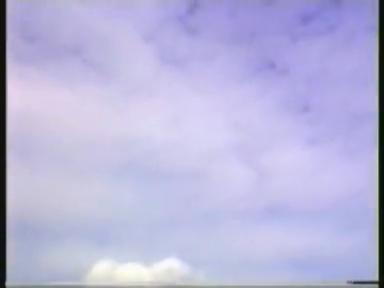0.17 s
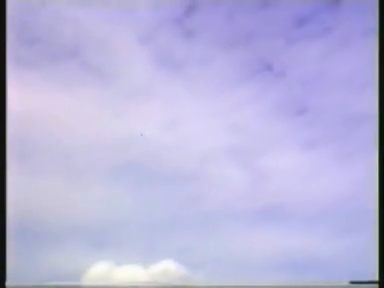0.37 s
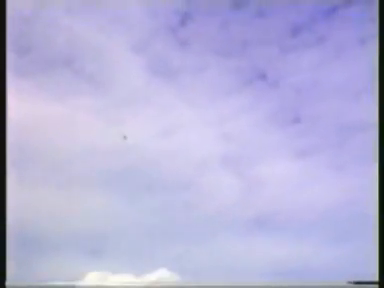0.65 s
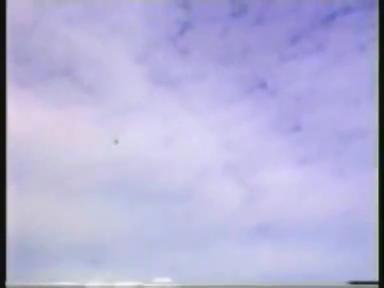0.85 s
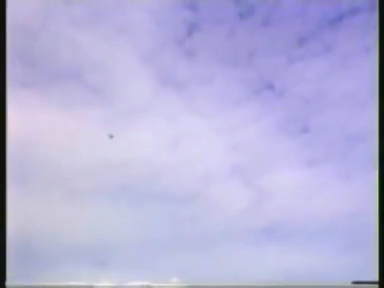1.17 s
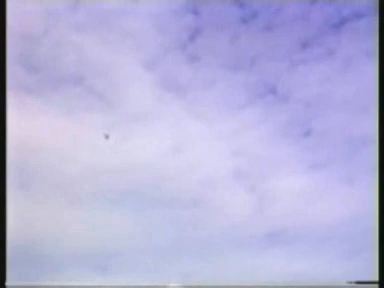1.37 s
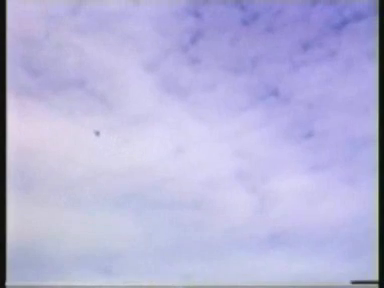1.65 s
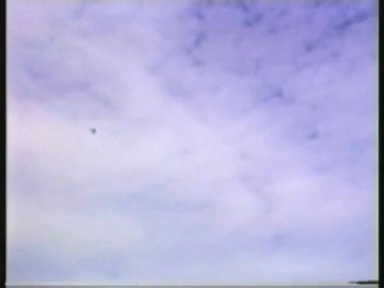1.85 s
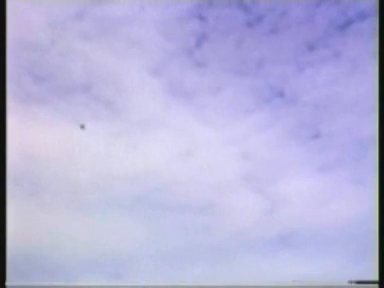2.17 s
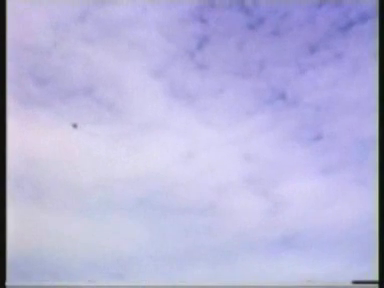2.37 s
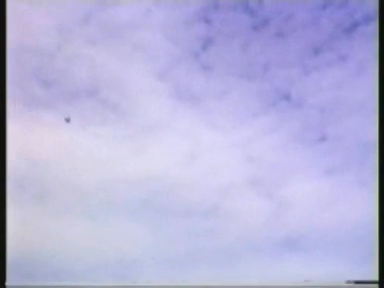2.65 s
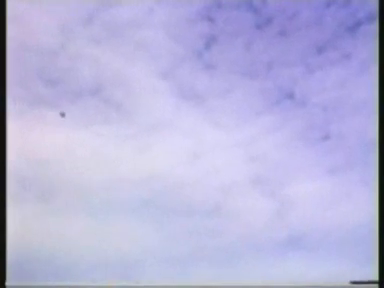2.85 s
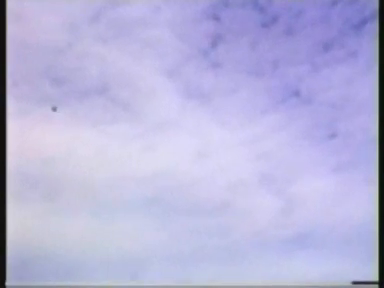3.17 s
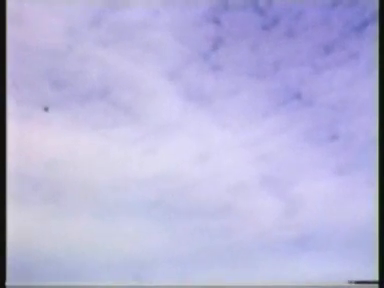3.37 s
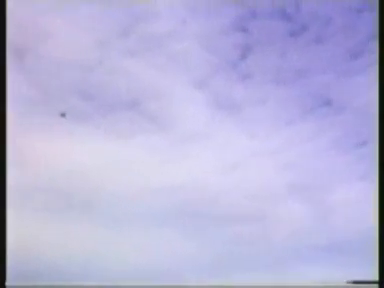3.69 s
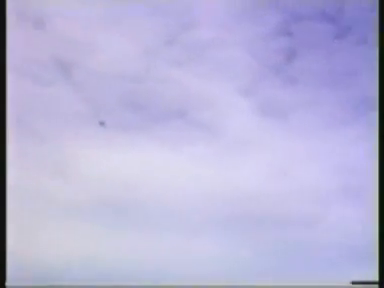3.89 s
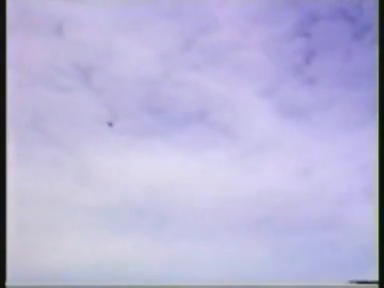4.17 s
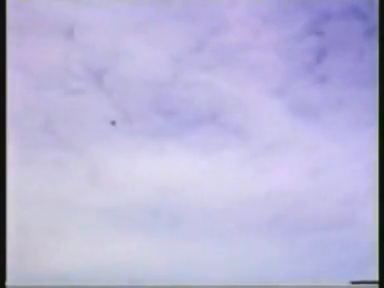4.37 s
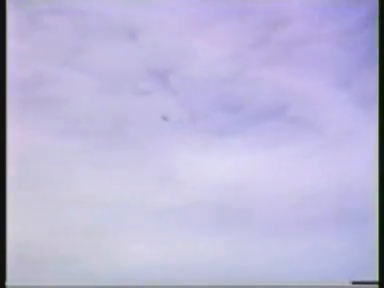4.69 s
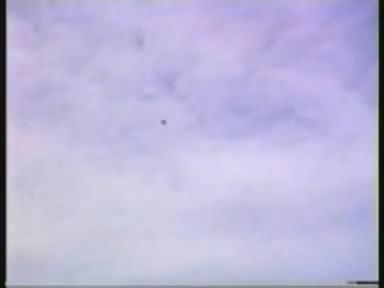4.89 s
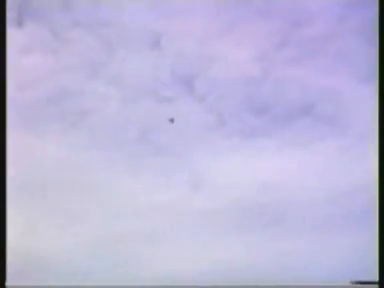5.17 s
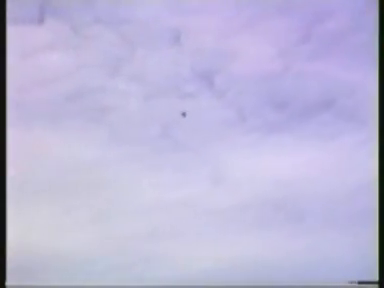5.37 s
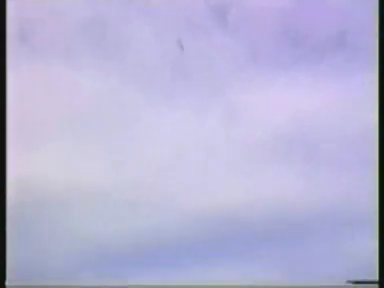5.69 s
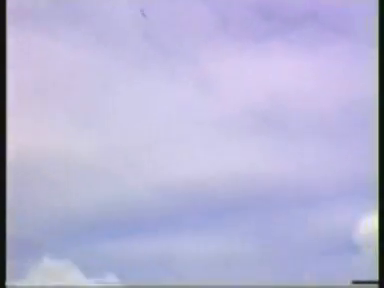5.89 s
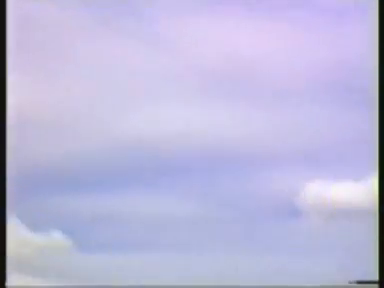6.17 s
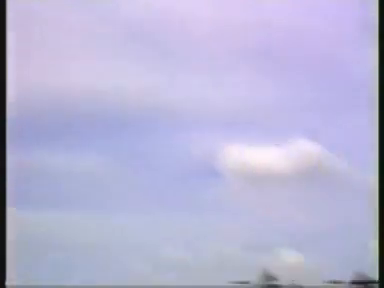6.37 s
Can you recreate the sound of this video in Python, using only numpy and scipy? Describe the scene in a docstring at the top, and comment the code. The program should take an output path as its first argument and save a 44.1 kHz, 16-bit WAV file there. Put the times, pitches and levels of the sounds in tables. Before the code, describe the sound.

A jet aircraft roars far overhead, its rumble swelling and fading with brief bursts of tearing crackle.

```python
"""A jet fighter roars far overhead as it climbs and turns, heard at head height on an open field.
On the way down, the sound waves of its exhaust steepen into small shocks; the strongest are heard as snaps.
Churning air makes the low, middle and high parts of the roar swell and fade over a deep rumble.
The ground reflects a second copy, which lags more as the jet climbs. The microphone circuit hisses softly."""
import sys
import numpy as np
from scipy import signal
from scipy.fft import rfft, irfft
from scipy.io import wavfile
from scipy.ndimage import uniform_filter1d

SR = 44100
rng = np.random.default_rng(int(sys.argv[2]) if len(sys.argv) > 2 else 0)


def unload_wav(signal):
    """Save mono or channel-first audio to the path in sys.argv[1] as 16-bit WAV at rate SR, clipped to [-1, 1]."""
    wavfile.write(
        sys.argv[1],
        SR,
        np.round(np.clip(np.atleast_2d(signal).T, -1, 1) * 32767).astype(np.int16),
    )


N = 288237

# Tone colours, from low to high pitch: f/Hz, relative level/dB
EXHAUST_TONE = [(60, -31.5), (150, -9), (300, 2), (700, -5.5), (1500, -13.5), (3000, -31)]  # near the nozzle
ROAR_TONE = [(60, -56.5), (110, -12.5), (150, -5), (200, -3), (260, -1.5), (500, -1), (900, -7),
             (1300, -14.5), (2000, -25.5), (2700, -38), (3150, -58.5), (3600, -45.5), (4500, -47),
             (7000, -61.5)]  # after the air and the microphone
SCATTER_TONE = [(10, 10), (150, 8), (230, -6), (1200, -6), (2500, -5), (4000, -2), (SR / 2, -2)]  # sound that takes detours, which smear its shocks
SNAP_TONE = [(500, -9), (1000, -1.5), (2000, -12), (2700, -11.5), (3150, -26.5), (3600, -25), (4500, -24),
             (7000, -40)]
RUMBLE_TONE = [(15, -15), (30, -21), (45, -15.5), (70, -6), (95, -2), (125, -5), (170, -32)]
HISS_TONE = [(1500, -6), (2800, 1), (3150, -2.5), (3600, -2.5), (5000, -4.5), (7200, -3.5)]

# Swells that the churning air lets through: t/s, level/dB
BASS_SWELL = [(-0.0, -17), (.08, -29.5), (0.22, -22.5), (.33, -28.5), (0.61, -33.5), (1.04, -37.5),
              (1.13, -31), (1.55, -26.5), (1.75, -29.5), (2.0, -26), (2.32, -27.5), (2.72, -32),
              (2.91, -30), (3.31, -36.5), (3.61, -29.5), (3.75, -28.5), (3.92, -26), (4.19, -32.5),
              (4.36, -24), (4.58, -34), (4.75, -32.5), (5.0, -40.5), (5.36, -38), (5.43, -27),
              (5.76, -27.5), (6.05, -39.5), (6.54, -35)]
LOW_MID_SWELL = [(0, -25), (.12, -23), (.18, -19), (.25, -24.5), (.38, -23.5), (.56, -37), (.95, -38.5),
                 (1.5, -25.5), (1.9, -24.5), (2.2, -24.5), (2.4, -30.5), (2.85, -33), (3.2, -38.5),
                 (3.5, -34.5), (3.8, -26), (3.86, -24), (3.95, -27.5), (4.1, -29), (4.45, -29.5),
                 (4.65, -38), (5.36, -34.5), (5.42, -34), (5.475, -30.5), (5.495, -21.5), (5.53, -29),
                 (5.57, -27.5), (5.75, -31.5), (6.25, -38), (6.45, -37), (6.54, -30.5)]
MID_SWELL = [(0.0, -26.5), (.13, -31.5), (0.26, -24.5), (.4, -31.5), (0.53, -35.5), (0.93, -39),
             (1.25, -34.5), (1.62, -26.5), (1.76, -27), (1.81, -32.5), (1.9, -29), (2.03, -29.5),
             (2.14, -28.5), (2.35, -39.5), (2.75, -31), (3.23, -43), (3.65, -36), (3.95, -31.5),
             (4.15, -26.5), (4.45, -27.5), (4.65, -38), (5.33, -37.5), (5.46, -31), (5.54, -28),
             (5.66, -32), (5.8, -36), (6.02, -31), (6.12, -30), (6.2, -38), (6.54, -37.5)]
DEEP_SWELL = [(-0.0, -42.5), (0.2, -50), (.5, -48), (.9, -51.5), (1.5, -52), (1.97, -53), (2.27, -57),
              (3.24, -53.5), (3.38, -50), (3.71, -53), (3.97, -45.5), (4.12, -50.5), (5.57, -59),
              (6.06, -63.5), (6.54, -63)]  # also sets the level of the rumble
# Tearing rasp at the top of the roar: t/s, level/dB
RASP = [(0.0, -48.5), (0.02, -59.5), (0.14, -59), (0.18, -53), (0.42, -57.5), (0.76, -65), (1.09, -65.5),
        (1.4, -61), (1.42, -63), (1.49, -56.5), (1.53, -60.5), (1.56, -52.5), (1.58, -56.5), (1.86, -64.5),
        (1.91, -59), (1.95, -61.5), (2.02, -51.5), (2.11, -63), (2.13, -57.5), (2.24, -64.5), (2.53, -66.5),
        (2.77, -59.5), (2.88, -64.5), (3.35, -70), (3.6, -63.5), (3.62, -64.5), (3.68, -69), (3.77, -63.5),
        (4.08, -63.5), (4.11, -60.5), (4.24, -56), (4.26, -61.5), (4.37, -60.5), (4.39, -55), (4.62, -67.5),
        (5.39, -69), (5.59, -61), (5.77, -64), (5.9, -65.5), (5.99, -60), (6.26, -69.5), (6.33, -67),
        (6.5, -70.5), (6.54, -64.5)]
# Short tearing flares, strongest in the treble: t/s, rise/dB, half length/s
FLARES = [(0.031, 2, .03), (0.097, 7, 0.071), (0.206, -0.5, 0.036), (0.262, 2, 0.088), (1.481, -2, 0.023),
          (1.557, -4, 0.0074), (1.622, 0.5, 0.019), (1.704, -0.5, 0.016), (1.746, -0.5, 0.015),
          (1.908, 8, 0.023), (1.97, 2.5, 0.026), (2.031, 7.5, 0.019), (2.069, 5, 0.013),
          (2.126, 0.5, 0.007), (2.168, 3, .02), (2.204, -1, 0.014), (2.698, -1, 0.021), (2.759, 8.5, 0.073),
          (3.578, 6.5, 0.054), (4.116, 6.5, .025), (4.156, 3.5, 0.022), (4.212, 8, 0.043),
          (4.263, 3, 0.021), (4.401, 8.5, 0.02), (4.461, 4.5, 0.028), (4.507, 6.5, 0.023),
          (5.166, 4.5, 0.1), (5.527, 8, 0.013), (5.574, 10, 0.023), (5.665, 6.5, 0.054), (5.948, 5.5, .03),
          (6.029, 11.5, .05)]

# Borders that split the roar into seven bands (ranges of pitch): f/Hz
BAND_EDGES = [170, 330, 480, 700, 1400, 3100]
# One row a band, low to high: base level/dB, how far it follows each swell (bass, low mid, mid, deep),
# how far it follows the flares, drift/(dB per s)
BANDS = [(-45, 0.55, 0.059, 0.086, 0.63, -0.055, 2.5), (-32, 0.99, 0.074, -0.19, 0.012, 0.22, 0),
         (-34.5, 0.12, 0.88, -0.21, 0.18, 0.23, 0.3), (-35, -0.15, 0.78, 0.34, 0, -0.18, -0.12),
         (-34, 0.0071, -0.014, 1.02, 0.037, 0.094, 0.33), (-45.5, 0.21, 0.032, 0.51, 0.12, 0.86, -0.37),
         (-68, 0, 0.12, 0.29, 0, 0.24, -0.4)]
# One value a band, low to high:
BAND_RASP = [0.021, 0, 0.061, 0, 0.026, 0, .9]  # how far it follows the rasp
BAND_FLUTTER = [0.37, 0.49, 0.18, 0.53, 0.98, 1.2, 2.2]  # quick random flutter: level/dB
BAND_EVENING = [.3, .25, .2, .16, .12, .06, .035]  # span over which its loudness is evened out: t/s

# Single strong shocks: t/s, peak level above 2.5 kHz/dB
SNAPS = [(0.053, -38.5), (0.093, -32.5), (0.1226, -42.5), (0.2116, -36), (0.2614, -40.5), (1.5443, -40.5),
         (1.5568, -39), (1.569, -38), (1.6206, -40), (1.7, -41), (1.8615, -41.5), (1.885, -40.5),
         (1.9114, -37.5), (1.921, -41), (1.976, -35), (2.004, -35.5), (2.121, -40.5), (2.6843, -43),
         (2.6995, -36), (4.208, -34.5), (4.216, -39), (4.228, -33.5), (4.239, -39.5), (4.276, -40.5),
         (4.3323, -45.5), (4.3784, -41.5), (4.399, -39), (4.427, -41), (5.514, -42.5), (5.5217, -41),
         (5.541, -42), (5.5522, -39.5), (5.5705, -38), (5.5755, -40), (5.5815, -39), (5.6443, -40.5),
         (6.0096, -41.5), (6.0582, -41)]
# Ground reflection: t/s, lag/ms, share that comes back as a clean copy (0-1)
BOUNCE = [(0, 3.17, 0.73), (.3, 3.13, 0.9), (.48, 3.53, .9), (.65, 3.1, 0.5), (.9, 3.24, 0.25),
          (1.4, 3.54, 0.7), (1.7, 3.55, 0.6), (2.0, 3.85, .99), (2.3, 3.72, 0.8), (2.6, 4.05, 0.54),
          (2.9, 4.2, 0.53), (3.2, 4.68, 0.65), (3.6, 4.14, 0.32), (3.9, 4.38, 0.55), (4.2, 4.5, 0.55),
          (4.7, 4.7, 0.6), (5.1, 4.74, 0.3), (5.6, 5.1, 0.61), (6.0, 5.02, 0.55), (6.54, 5.15, 0.6)]


def jet():
    """The roar: exhaust noise that has crossed the air and swells and fades band by band."""
    levels = band_levels()
    # Surges come by a clear path and keep their shocks; lulls are scattered and smooth.
    half_shock_db = -32.5  # at this 700-1400 Hz level, half of the shock strength survives
    shock_strength = 2 / (1 + undb(half_shock_db - levels[4]))
    spectrum = through_air(exhaust(shock_strength))
    octave = np.log2(np.fft.rfftfreq(N, 1 / SR) + 1)
    below_edge = [0] + [1 / (1 + np.exp(10 * (octave - np.log2(hz)))) for hz in BAND_EDGES] + [1]
    roar = 0
    for k, db in enumerate(levels):
        band = irfft(spectrum * (below_edge[k + 1] - below_edge[k]), N)
        # Even out the loudness first, so that the swell sets it.
        band /= np.sqrt(uniform_filter1d(band ** 2, size=int(BAND_EVENING[k] * SR)))
        roar += band * undb(db + 0.78 * wander(18))
    return roar


def exhaust(shock_strength):
    """Exhaust mixing with the air makes a flickering noise that grows sharp crests and shocks."""
    mixing = noise(EXHAUST_TONE) * undb(0.76 * wander(40))
    rounded = unit(np.tanh(mixing / 2.3))  # the tallest crests lose energy fastest
    peaked = rounded + .3 * shock_strength * (rounded ** 2 - 1)
    return steepen(peaked, lead_ms=.25 * shock_strength)


def steepen(wave, lead_ms, steps=6):
    """Crests outrun troughs and close up into shocks; a crest of height 1 arrives lead_ms early."""
    samples = np.arange(N)
    for _ in range(steps):
        arrival = samples - wave * lead_ms * SR / 1000 / steps
        # Where a crest would overtake, the wave stands as one jump in the middle.
        arrival = (np.maximum.accumulate(arrival) + np.minimum.accumulate(arrival[::-1])[::-1]) / 2
        wave = np.interp(samples, arrival, wave)
    return wave


def through_air(wave):
    """Spectrum after the long path: a new tone colour, the same shocks, and scattered sound added."""
    spectrum = rfft((wave - wave.mean()) * signal.windows.tukey(N, .002))
    flattened = spectrum / np.sqrt(uniform_filter1d(np.abs(spectrum) ** 2, size=401))
    scattered = gains(SCATTER_TONE) * rfft(rng.standard_normal(N)) / np.sqrt(N)
    return gains(ROAR_TONE) * (flattened + scattered)


def band_levels():
    """Each band's level in dB: churning air brings swells, and the jet's turn brings a slow drift."""
    t = np.arange(N) / SR
    swells = curves(BASS_SWELL) + curves(LOW_MID_SWELL) + curves(MID_SWELL) + curves(DEEP_SWELL)
    flares = sum(db * np.exp(-((t - when) / half) ** 2) for when, db, half in FLARES)
    changes = [db - db.mean() for db in swells] + [flares, t - t.mean()]
    rasp = curves(RASP)[0]
    rasp -= rasp.mean()
    levels = []
    for (base_db, *shares), rasp_share, flutter_db in zip(BANDS, BAND_RASP, BAND_FLUTTER):
        level = base_db + np.dot(shares, changes) + rasp_share * rasp
        levels.append(level + 0.3 * wander(6) + flutter_db * wander(45))
    return levels


def snaps():
    """The strongest shocks: each is a sudden jump in pressure, trailed by scattered sound."""
    times, db = np.transpose(SNAPS)
    tail_ms, tail_db = 5, -12
    ms = np.arange(SR // 40) * 1000 / SR
    bursts = rng.standard_normal((len(times), len(ms))) * np.exp(-ms / tail_ms)
    bursts *= undb(tail_db) / np.sqrt(tail_ms * SR / 2000)
    bursts[:, 0] = 1  # the shock itself
    spikes = np.zeros(N)
    positions = (times * SR).astype(int)[:, None] + np.arange(len(ms))
    np.add.at(spikes, positions, bursts * undb(db)[:, None])
    jump = -1j * gains(SNAP_TONE)  # -1j turns a spike into a jump
    treble = irfft(jump * (np.fft.rfftfreq(N, 1 / SR) > 2500), N)
    return irfft(rfft(spikes) * jump, N) / np.abs(treble).max()


def ground_bounce(sound):
    """Adds the later copy off the grass: strongest in the bass, where its share rises and falls over time,
    about half as strong in the middle, none in the treble."""
    samples = np.arange(N)
    lag_ms, clean_share = curves(BOUNCE)
    waver_ms = .02 + .5 * (1 - clean_share) ** 2  # a less clean copy wavers more
    lag = (lag_ms + waver_ms * wander(7)) * SR / 1000

    def with_copy(part, share):
        return (part + share * np.interp(samples - lag, samples, part)) / np.sqrt(1 + share ** 2)

    bass, below_treble = (signal.sosfiltfilt(signal.butter(2, hz, fs=SR, output="sos"), sound)
                          for hz in (746, 1720))
    middle, treble = below_treble - bass, sound - below_treble
    return with_copy(bass, clean_share) + with_copy(middle, 0.51 * clean_share) + treble


def rumble():
    """The deepest part of the roar, which swells on its own."""
    return noise(RUMBLE_TONE) * undb(curves(DEEP_SWELL)[0] + 1.4 * wander(10))


def hiss():
    """The soft, steady hiss of the microphone circuit."""
    return noise(HISS_TONE) * undb(-64)


def undb(db):
    """Turns decibels into a factor to multiply by."""
    return 10 ** (np.asarray(db) / 20)


def unit(x):
    """Scales a signal to an average strength (rms) of 1."""
    return x / np.sqrt(np.mean(x ** 2))


def gains(tone):
    """Turns a tone colour table into a factor for every frequency."""
    hz, db = np.transpose(tone)
    return undb(np.interp(np.log(np.fft.rfftfreq(N, 1 / SR) + 1), np.log(hz), db, left=-90, right=-90))


def noise(tone):
    """Noise of strength 1 with the given tone colour."""
    return unit(irfft(rfft(rng.standard_normal(N)) * gains(tone), N))


def wander(rate):
    """A smooth random curve of strength 1 that heads for a new value rate times a second."""
    hold = int(SR / rate)
    steps = np.repeat(rng.standard_normal(N // hold + 1), hold)
    return unit(uniform_filter1d(uniform_filter1d(steps, hold), hold)[:N])


def curves(table):
    """Joins the points of a time table with straight lines; gives a list with one curve a column."""
    times, *columns = np.transpose(table)
    return [np.interp(np.arange(N) / SR, times, column) for column in columns]


def scene():
    """Roar and snaps with their ground reflection, over the rumble, in one channel."""
    return (ground_bounce(jet() + snaps()) + rumble())[None]


def record(dry):
    """The microphone circuit rounds the loudest crests, adds hiss and cuts the highest treble."""
    ceiling, top_hz = .42, 6990
    rounded = ceiling * np.tanh(dry / ceiling)
    return signal.sosfilt(signal.ellip(14, .2, 75, top_hz, fs=SR, output="sos"), rounded + hiss())


dry = scene()
out = record(dry)
unload_wav(out)
```